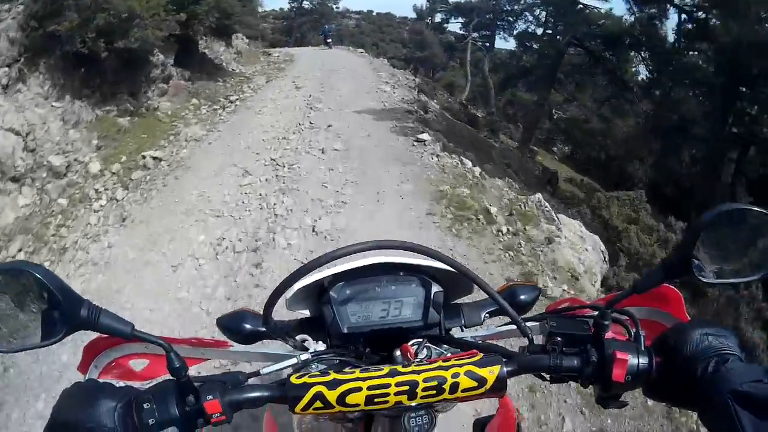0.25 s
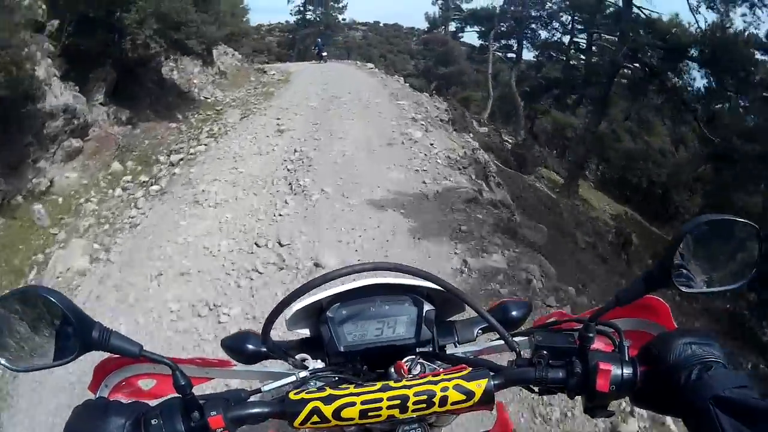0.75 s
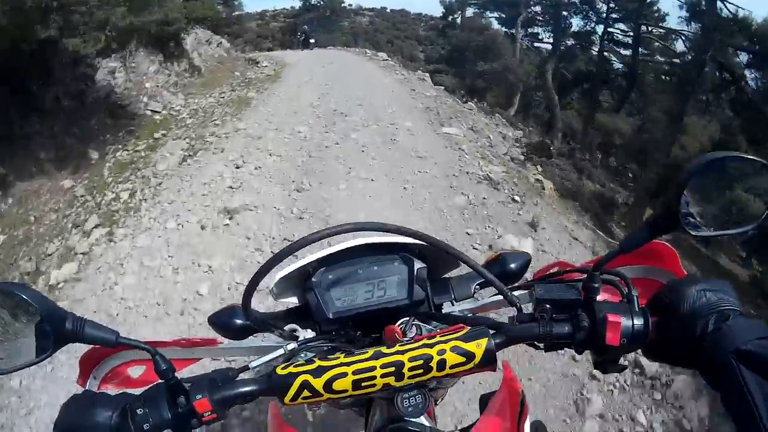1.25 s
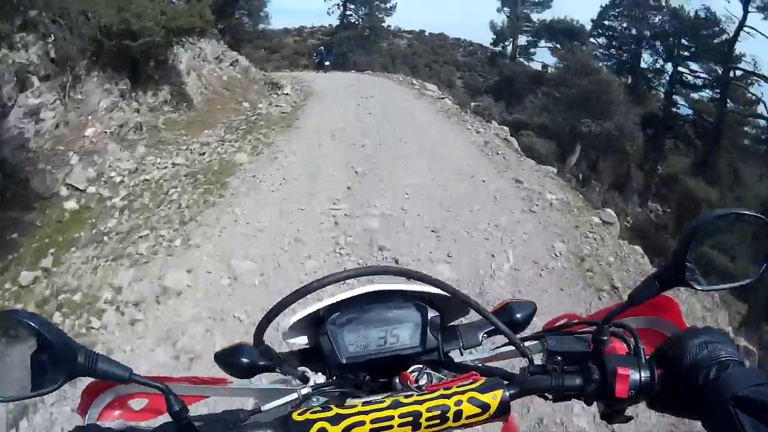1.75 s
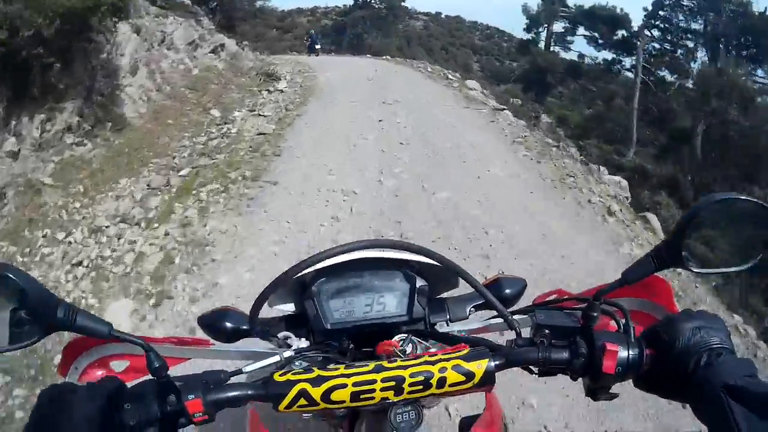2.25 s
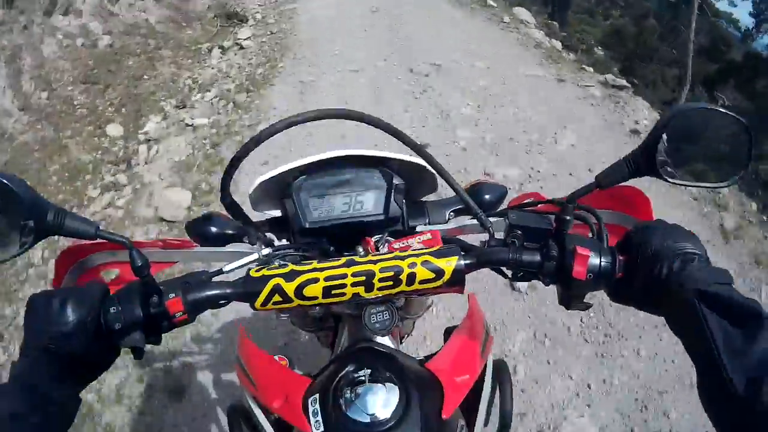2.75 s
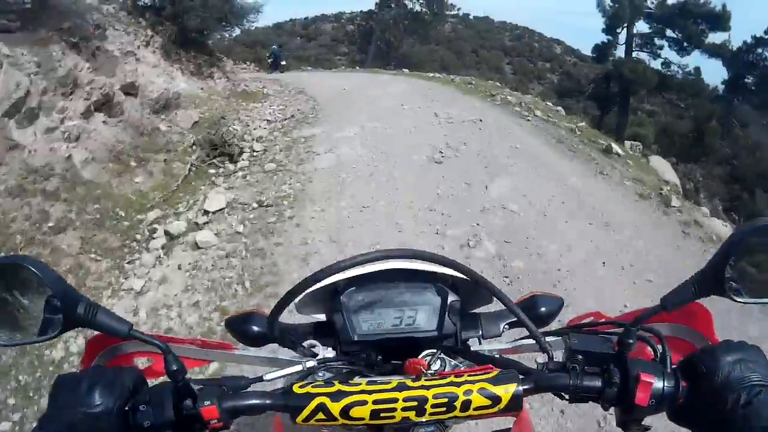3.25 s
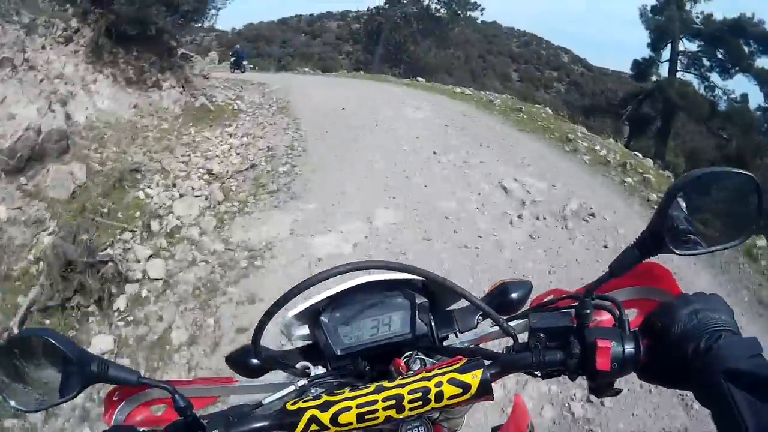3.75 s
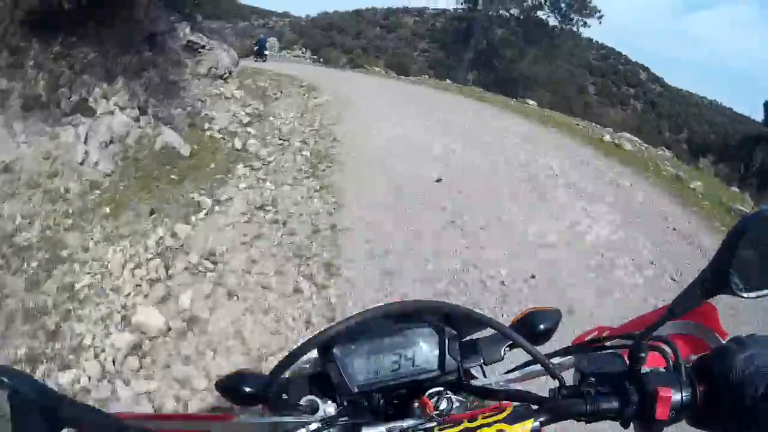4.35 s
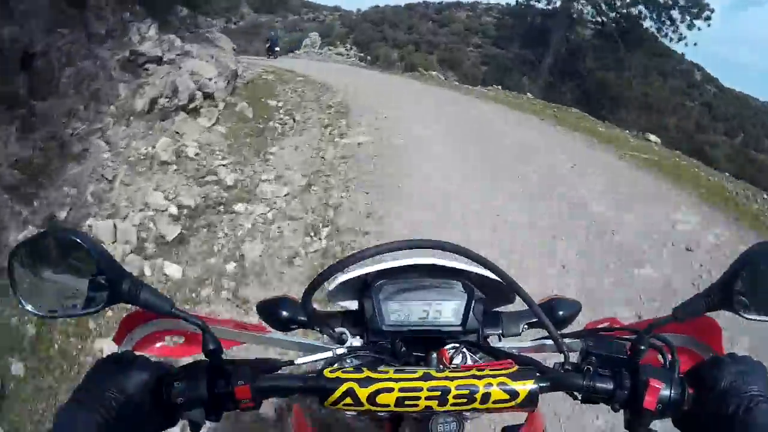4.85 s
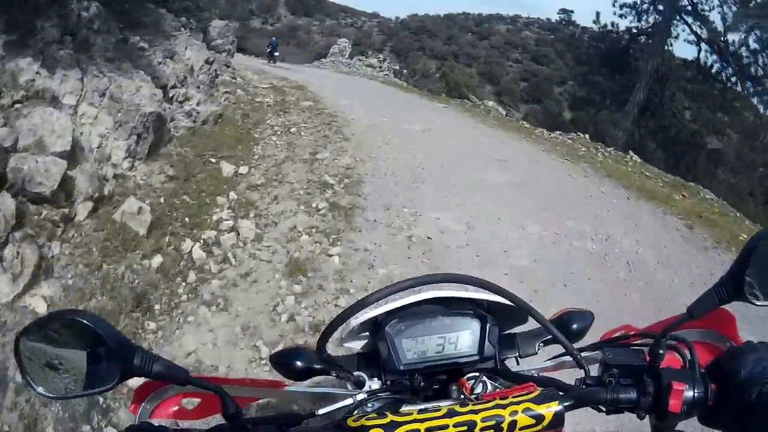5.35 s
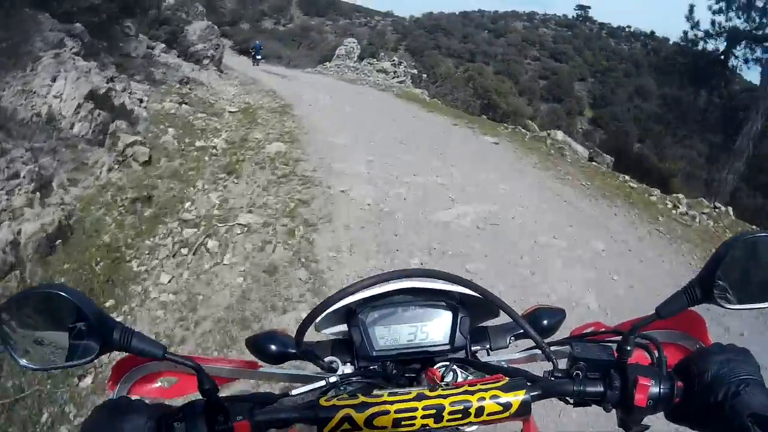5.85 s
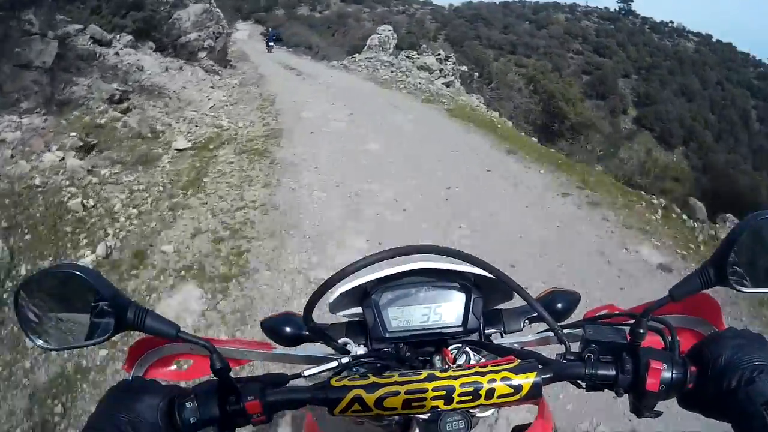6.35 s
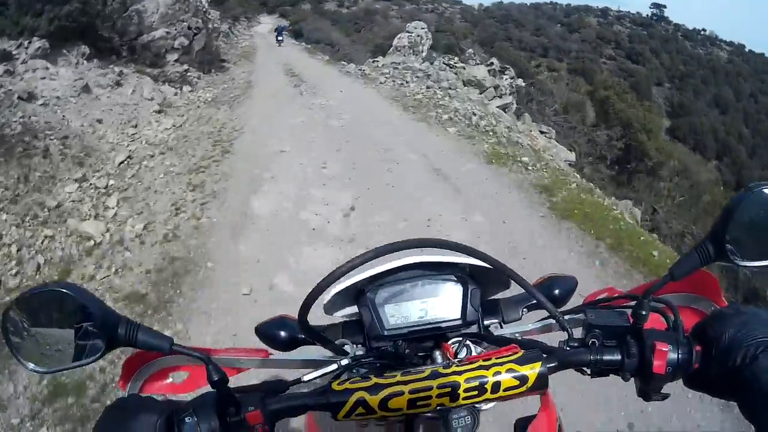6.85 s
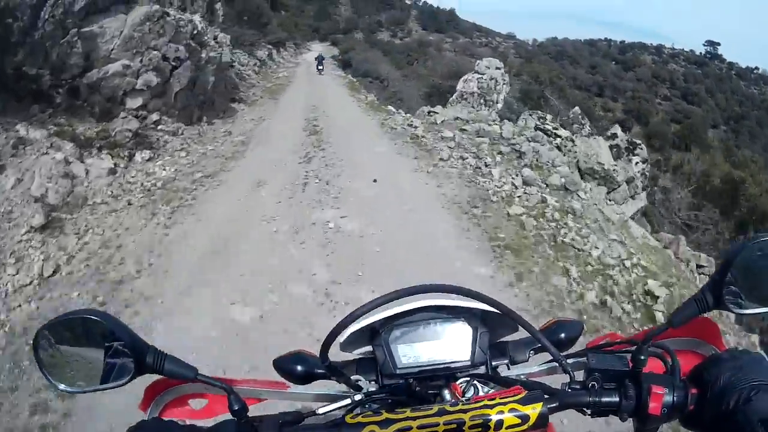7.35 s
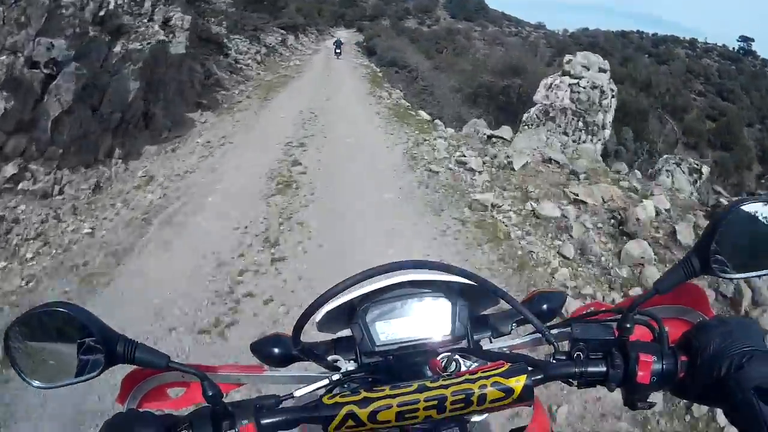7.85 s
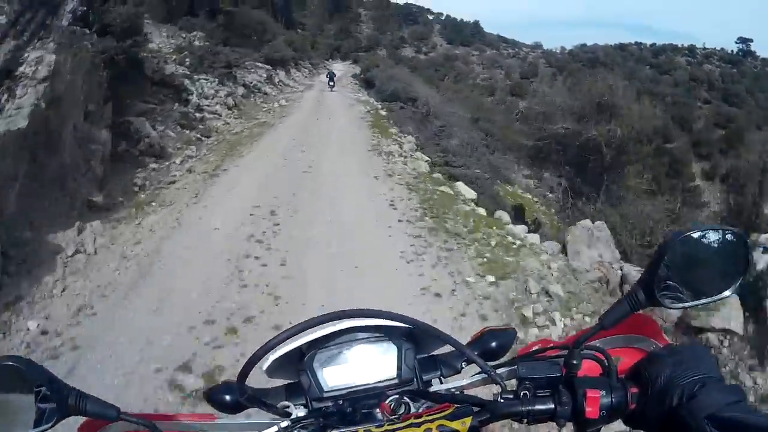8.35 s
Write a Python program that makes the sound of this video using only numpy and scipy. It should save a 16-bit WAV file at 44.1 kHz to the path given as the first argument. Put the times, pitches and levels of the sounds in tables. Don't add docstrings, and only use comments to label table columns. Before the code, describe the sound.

A small off-road motorbike climbs a rough open-air gravel track, its fast firing pulses blurred into a nasal, hissy rattle inside a plastic camera case. Jolts hit the case as dull thuds and hard clacks, busiest from one to three seconds. The pitch sags with a gear change, then slowly rises, ticking more clearly near the end. Deep bass sways, loose metal tinkles, and the close microphone hisses faintly.

```python
import sys
import numpy as np
from scipy import signal
from scipy.fft import rfft, irfft
from scipy.io import wavfile
from scipy.ndimage import uniform_filter1d

SR = 44100
rng = np.random.default_rng(int(sys.argv[2]) if len(sys.argv) > 2 else 0)


def attenuation_scalar(level_db):
    decades = np.asarray(level_db, float) / 20
    return 10 ** decades


def transcribe(signal):
    frames = np.atleast_2d(signal).T
    limited = np.clip(frames, -1, 1)
    pcm = np.round(limited * 32767).astype(np.int16)
    wavfile.write(sys.argv[1], SR, pcm)


N = 379260

# (time [s], firing rate [Hz])
REVS_HZ = [(0, 37.7), (.46, 37.75), (.82, 38.4), (1.2, 39), (2, 40.3), (2.6, 40.6), (2.88, 38.2), (3, 39.9),
           (3.07, 39.3), (3.14, 37.6), (3.27, 37.2), (3.3, 32), (3.45, 29.7), (3.65, 28.2), (5, 28.5),
           (6.5, 29), (7.48, 29.9), (8.6, 31.1)]
# (time [s], effort [dB], gear tooth level [dB], firing sharpness [0-1])
THROTTLE = [(0, 0, -62, 0.7), (.6, -0.5, -65, 0.8), (.9, -1, -66, 0.9), (1.2, 0, -60, 0.64), (2, 3, -68, 0),
            (2.6, 4, -64, 0.96), (2.85, 0, -66, 0.2), (2.94, -1, -47, .2), (3.05, -3.5, -49, 0.2),
            (3.2, -1.5, -45, 0), (3.3, 1, -58, 0.6), (3.45, 1.8, -64, 0.5), (3.7, -0.1, -80, 1),
            (4.25, 4, -60, 0.74), (5, 1.5, -75, 0.5), (6.1, 2, -68, 0.67), (7.4, -1, -65, 0.9),
            (8.6, 0, -66, 0.9)]
# (time [s], share of clatter repeated each cycle [0-1])
EVENNESS = [(0, .8), (.85, .75), (1.2, .4), (2, .2), (2.6, .1), (3.7, .15), (7, .2), (7.5, .5), (8, .55),
            (8.6, .4)]
# (frequency [Hz], width [Hz], level [dB])
LID = [(1277, 84, 1), (1366, 79, 4.5)]
# (frequency [Hz], width [Hz], level [dB])
WALLS = [(1559, 157, -0.5), (1764, 107, 5.5), (1904, 96, -2), (2101, 146, 0.5), (2314, 227, -3),
         (2536, 57, -12)]
# (frequency [Hz], width [Hz], level [dB])
CLATTER = [(2850, 260, -3.5), (2977, 220, 4), (3860, 630, -4.5), (4412, 384, -2.5), (5410, 1520, -10.5),
           (6250, 110, -15)]
# (frequency [Hz], width [Hz], level [dB])
EXHAUST = [(501, 68, 2), (618, 81, 0.5), (1063, 780, -11.5)]
# (frequency [Hz], width [Hz], level [dB])
BUZZ = [(2746, 190, 0)]
# (level [dB], effort slope [dB/dB], rough ground slope [dB/dB], revs slope [dB/Hz])
NOISE_LEVELS = [
    (-57.5, 0.63, 0.55, 0),
    (-54, 0.46, 0.1, 0.36),
    (-63.5, 1.13, 0.37, 0.18),
    (-60, 1.4, 0.65, 0.15),
    (-76, 0.6, 0.3, 1.97),
]
# (frequency [Hz], width [Hz], level [dB])
BARK = [(1288, 46, 0), (2270, 40, -11), (2535, 50, -10)]
# (time [s], level [dB])
TICK_DB = [(0, -69), (3.3, -74), (4.1, -66.5), (6, -68), (7.4, -61.5), (8.6, -57.5)]
# (frequency [Hz], level [dB], t60 [s])
TICK_RING = [(2110, 1, 0.018), (2230, 1, 0.02), (2990, -13, .01)]
# (frequency [Hz], width [Hz], level [dB])
PIPE = [(267, 45, 6), (385, 30, -5), (455, 30, -1), (500, 35, -4), (605, 30, 1), (648, 40, 2.5)]
# (frequency [Hz], width [Hz], level [dB])
GEAR_WINDOWS = [(1767, 540, -7.5), (2160, 980, 2)]
# (time [s], knock peak [dB], mount [dB], shell [dB], snap [dB])
STONES = [(.003, -32.5, -42, -42, -52), (1.384, -28.5, -50, -62, -39.5), (1.537, -33.5, -57, -42, -34.5),
          (1.582, -23.5, -54, -40, -37.5), (1.659, -23, -37, -32, -40), (1.711, -20.5, -33, -51, -36),
          (1.755, -10, -20, -29, -24.5), (1.764, -22, -54, -39, -32), (1.896, -37, -35, -35, -42),
          (2.189, -33.5, -46, -35, -41), (2.399, -28.5, -30.5, -33, -32.5), (2.446, -7.5, -19, -23, -29),
          (2.46, -27, -25, -37, -57), (2.891, -32, -37, -32.5, -41), (2.978, -16, -26.5, -37, -45),
          (4.125, -26, -37, -36, -39.5), (5.267, -28, -39.5, -34.5, -46), (6.502, -26.5, -45, -34, -40),
          (6.525, -29.5, -62, -35, -44), (6.697, -38, -36, -38, -50), (6.749, -6, -17, -21, -26),
          (7.011, -22, -36, -36, -29.5), (7.014, -29, -55, -33, -39), (7.341, -30.5, -38, -33.5, -44),
          (8.193, -32.5, -40.5, -41, -64)]
# (time [s], knock peak [dB], mount [dB], shell [dB])
RUTS = [(1.257, -29.5, -38, -36), (2.22, -34, -32.5, -52), (2.656, -34, -42, -42), (2.713, -32, -42, -41),
        (2.918, -36, -49, -44), (3.153, -32.5, -58, -38), (3.188, -29, -39, -40), (3.492, -28.5, -37, -35),
        (3.509, -36, -34, -41), (3.687, -37.5, -36.5, -46), (3.856, -31, -42, -51), (4.139, -28, -34, -45),
        (4.262, -34, -40, -45), (4.312, -33, -35.5, -52), (1.94, -44, -47, -40.5), (2.416, -37, -33, -50),
        (2.5, -37, -40, -49), (2.83, -42, -40.5, -40.5), (3.533, -36, -40, -45), (3.97, -43, -48, -46),
        (5.04, -48, -49, -45), (4.63, -39, -43, -58), (2.405, -40, -43, -38.5), (1.268, -40, -48, -40),
        (4.148, -38, -50, -41.5), (6.676, -37, -60, -45), (4.437, -23.5, -33.5, -53),
        (4.456, -31.5, -64, -41), (4.706, -34, -35, -49), (4.73, -32.5, -34.5, -39), (5.284, -37, -45, -53),
        (5.449, -32.5, -43.5, -47), (5.611, -31.5, -33, -55), (5.855, -30, -36.5, -42.5),
        (6.037, -33.5, -46.5, -68), (6.196, -30, -43, -55), (6.561, -35.5, -49, -42),
        (6.668, -28.5, -69, -48), (6.938, -32, -41.5, -37.5), (7.358, -31.5, -51, -62),
        (7.387, -33.5, -28.5, -40)]
# (time [s], knock peak [dB], mount [dB])
PEBBLES = [(.668, -42, -51), (1.217, -38, -61), (1.673, -37, -35), (2.024, -45, -40), (2.058, -36, -44),
           (2.132, -42, -59), (2.309, -33.5, -37), (2.353, -35, -44), (4.349, -34, -34),
           (4.392, -60, -34.5), (5.236, -37, -43.5), (5.483, -42, -53), (6.239, -33, -47),
           (6.369, -51, -41.5), (6.895, -42, -45), (7.64, -43, -42), (8.467, -40.5, -45), (1.48, -36, -51),
           (1.849, -39, -39), (1.965, -43, -42), (2.092, -37, -52), (2.807, -36, -38), (3.719, -40, -39),
           (4.058, -47, -45), (4.189, -43, -56), (4.477, -43, -48)]
# (frequency [Hz], level [dB], t60 [s])
MOUNT = [(99.2, -1, 0.24)]
# (frequency [Hz], level [dB], t60 [s])
STRAP = [(160, -6.5, 0.072)]
# (frequency [Hz], level [dB], t60 [s])
BODY = [(251.7, 2, 0.028), (294.7, 0.5, 0.034), (352, -12, 0.031)]
# (frequency [Hz], level [dB], t60 [s])
SHELL = [(572, -2.5, 0.023), (668, -3.5, 0.04), (723, -0.5, 0.015), (926, -6.5, 0.021)]
# (frequency [Hz], level [dB], t60 [s])
SNAP = [(1405, -6, 0.032), (1588, 3.5, 0.017), (1750, -15.5, 0.0092), (2850, -14, 0.015),
        (4170, -22, 0.0027)]
# (time [s], rumble [dB])
TRACK_DB = [(0, -52.5), (.9, -49.5), (1.5, -46.5), (1.68, -47), (2.13, -49.5), (2.42, -53), (2.66, -54.5),
            (2.99, -45.5), (3.25, -51.5), (3.74, -49.5), (3.97, -56), (4.33, -53.5), (4.6, -57), (5.1, -52),
            (6.4, -57), (7.2, -53), (7.66, -52), (8.6, -53.5)]
# (time [s], sway [dB])
HEAVES_DB = [(.03, -49), (.69, -46), (1.1, -47), (1.4, -43), (1.68, -40), (1.95, -41.5), (2.1, -44),
             (2.42, -36.5), (2.9, -35.5), (3.21, -51), (3.5, -50), (3.74, -52), (3.9, -48), (4.14, -52),
             (4.33, -35.5), (4.81, -53), (5.27, -44), (5.6, -44.5), (6.23, -45), (6.6, -52), (6.75, -49),
             (7.4, -55), (7.66, -66), (7.91, -66), (8.19, -50)]
# (frequency [Hz], level [dB], t60 [s])
STEEL = [
    [(8030, -2.5, .1), (8095, -4, .08), (10350, -5, .05)],
    [(11275, 0, .1), (11315, 0, .08), (15650, -5, .08)],
    [(11750, 2, .09), (11790, -2, .08), (13050, -6, .06)],
]
# (time [s], peak [dB])
BUCKLE_TAPS = [(1.5943, -68), (1.6626, -63), (1.696, -73), (1.7814, -69), (2.1435, -66), (2.1799, -60),
               (2.2727, -63), (2.3705, -63), (2.3999, -69), (2.5187, -71), (2.72, -59), (4.121, -61),
               (4.358, -65), (5.0115, -67), (6.7012, -72), (6.7346, -63)]
# (time [s], middle peak [dB], high peak [dB])
KEY_TAPS = [(1.4536, -72, -73), (1.5307, -64, -60), (1.59, -61, -65), (1.6975, -65, -80), (1.931, -64, -69),
            (1.996, -66, -67), (2.054, -70, -65), (2.177, -65, -67), (2.2258, -55, -74), (2.259, -68, -77),
            (2.3466, -71, -80), (2.456, -77, -73), (2.604, -68, -67), (2.759, -64, -58), (2.527, -71, -66),
            (2.8574, -63, -80), (2.975, -61, -70), (3.1767, -71, -70), (3.693, -68, -69),
            (3.8197, -72, -72), (4.092, -64, -70), (4.18, -59, -75), (4.242, -64, -65), (4.283, -65, -58),
            (6.346, -70, -67), (6.521, -68, -66), (6.574, -64, -74), (6.6004, -59, -80), (6.7343, -66, -67),
            (6.9611, -70, -70)]
# (frequency [Hz], level [dB], t60 [s])
DRY_TICK = [(4080, -1.5, 0.0036), (6030, -4.5, .004), (7030, -2, .003), (9800, -5.5, .002)]
# (time [s], peak [dB])
FLINT = [
    (8.473, -49),
]
# (frequency [Hz], level [dB], t60 [s])
FLINT_RING = [(4400, 4, .014), (3850, -3, .014)]
# (frequency [Hz], level [dB])
HISS = [(600, -2), (3000, -6.5), (7000, -15.5), (10000, -16), (14000, -17.5), (16000, -21)]


def engine():
    revs_hz = curves(REVS_HZ)[0]
    phase = np.cumsum(revs_hz * (1 + .0008 * walk(6))) / SR
    cycle = phase.astype(int)
    strength = attenuation_scalar(4.2 * rng.standard_normal(N // 500))[cycle]
    thumps = level(np.diff(cycle, prepend=0) * strength, 0)
    effort_db, _, sharp = curves(THROTTLE)
    even = curves(EVENNESS)[0]
    rough_db = np.clip(curves(TRACK_DB)[0], -60, -40) + 50

    firing = 0.62 * np.exp(-(phase % 1) / 0.13) * strength
    idle = 0.13 * np.exp(-((phase + .5) % 1) / 0.12)
    gate = .5 + sharp * (firing + idle)

    repeat = same_each_cycle(phase)
    bark = level(resonate(repeat + .5 * rng.standard_normal(N), BARK), -57)
    bark = bark * even ** 2 * (revs_hz / 38) ** 3
    tick = level(ring(thumps, TICK_RING), 0) * attenuation_scalar(curves(TICK_DB)[0])
    out = tones(phase, repeat) + bark + tick

    shake_db = .6 * walk(16)
    parts = (LID, WALLS, CLATTER, EXHAUST, BUZZ)
    thumps_db = (-22.5, -16.0, -11.0, -4.5, -11)
    flickers_db = (0.28, 0.83, 1.13, 1.07, 0.62)
    for peaks, slopes, thump_db, flicker_db in zip(parts, NOISE_LEVELS, thumps_db, flickers_db):
        base_db, per_effort, per_rough, per_hz = slopes
        part_db = base_db + per_effort * effort_db + per_rough * rough_db + per_hz * (revs_hz - 34)
        noise = level(gate * rng.standard_normal(N), 0) + attenuation_scalar(thump_db) * sharp * thumps
        drive = np.sqrt(1 - even) * noise + np.sqrt(even) * repeat
        out = out + level(resonate(drive, peaks), 0.92) * attenuation_scalar(part_db + shake_db + flicker_db * walk(15))
    return out


def tones(phase, repeat):
    effort_db, gear_db, _ = curves(THROTTLE)
    tone_db = -55 + 0.1 * effort_db + 0.091 * (curves(REVS_HZ)[0] - 34)
    exhaust = level(resonate(repeat, PIPE), 0) * curves(EVENNESS)[0] * attenuation_scalar(tone_db + 1.5 * walk(3.07))

    turn = 2 * np.pi * phase
    gear_order = 23
    whine = 0
    for k in (2, 3):
        angle = gear_order * turn + .3 * np.sin(turn) + .4 * walk(40)
        whine = whine + attenuation_scalar(gear_db + 3 * walk(25)) * np.sin(k * angle)
    return steep_low(exhaust, 690) + steep_low(resonate(whine, GEAR_WINDOWS), 2300)


def same_each_cycle(phase, size=2048):
    bins = np.arange(size // 2 + 1)
    spectrum = np.exp(2j * np.pi * rng.random(size // 2 + 1)) * (bins < size / 8)
    once = irfft(spectrum, size)
    return level(np.interp(phase % 1 * size, np.arange(size + 1), np.append(once, once[0])), -3)


def bumps():
    s, knock_db, mount_db, shell_db, snap_db = blow_table()
    soft_db = np.maximum(knock_db, -34)
    bounce_db = -2 - 0.0562 * (soft_db + 21)
    looser = np.exp(-.03 * (soft_db + 24))
    strap_db = mount_db - 0.36 * (mount_db + 39)
    s = s + .0015
    n = len(s)

    snap = blows(s + 0.001027, snap_db - 0.5, 0.00014, bounce_db + 2.5, 0.0054 * looser, loose(n, count=12))
    mount = blows(s + 0.0018, mount_db + 4.5, 0.0045, bounce_db - 13.0, 0.0121, loose(n, count=4))
    strap = blows(s + 0.002, strap_db + 5.5, 0.0022, bounce_db - 6.0, 0.0111, loose(n, count=4))
    body = blows(s, knock_db - 4.5, 0.002, bounce_db - 2.5, 0.01285, loose(n, count=7))
    shell = blows(s + 0.00081, shell_db - 9.0, 0.00088, bounce_db + 5.5, .011 * looser, loose(n, count=14))

    out = ring(body, BODY) + ring(shell, SHELL) - ring(mount, MOUNT) - ring(strap, STRAP)
    out = out + high_pass(ring(snap, SNAP), 1160, order=3)
    return high_pass(out, 42, order=2)


def blow_table():
    ruts = [(*r, r[3] - 10) for r in RUTS]
    pebbles = [(*p, p[1] - 15.5, p[1] - 16.5) for p in PEBBLES]
    return np.transpose(STONES + ruts + pebbles)


def blows(times, db, push_s, bounce_db, bounce_s, chance):
    x = np.zeros(N + SR)
    push = np.hanning(int(push_s * SR) + 3)
    for t, d, b, span, (late, size) in zip(times, db, bounce_db, bounce_s + 0 * times, chance):
        at = ((t + np.append(0, span * late)) * SR).astype(int)
        bounces = attenuation_scalar(b) * np.tanh(size) * np.exp(-.6 * late)
        np.add.at(x, at, -attenuation_scalar(d) * np.append(1, bounces))
    return np.convolve(x, push / push.sum())[:N]


def loose(events, count):
    late = 0.291 + rng.exponential(size=(events, count))
    return np.stack([late, rng.standard_normal((events, count))], axis=1)


def ground():
    s, _, mount_db = blow_table()[:3]
    loosened = swells(s, mount_db - 21, rise_db_s=226, fall_db_s=153)
    rumble_gain = attenuation_scalar(curves(TRACK_DB)[0]) + loosened
    slack = 0.51 + 1.06 * loosened / rumble_gain
    sway_gain = attenuation_scalar(-55) + swells(*np.transpose(HEAVES_DB), rise_db_s=90, fall_db_s=85)

    hits = rng.random(N) < 450 / SR
    jolts = hits * rng.standard_normal(N) * attenuation_scalar(1.4 * rng.exponential(size=N))
    jolts = level(jolts, 0) + 0.59 * rng.standard_normal(N)
    soft = uniform_filter1d(jolts, size=40)

    rumble = level(ring(soft, MOUNT), -4.5) + level(ring(soft, BODY), -4.5)
    flap = level(ring(soft, STRAP), -11.5) + level(resonate(soft, [(140.8, 102, 0)]), -3.0)
    rumble = rumble + slack * flap
    sway = level(resonate(rng.standard_normal(N), [(16.3, 9.0, 11.0), (38.3, 76, 0.0)]), -0.58)
    return rumble * rumble_gain * attenuation_scalar(1.6 * walk(18)) + sway * sway_gain


def swells(times, db, rise_db_s, fall_db_s):
    t = np.arange(0, N + 200, 200) / SR
    late = t[:, None] - times
    gain = attenuation_scalar(db + np.where(late < 0, rise_db_s, -fall_db_s) * late).sum(axis=1)
    return np.interp(np.arange(N) / SR, t, gain)


def jingles():
    rough = attenuation_scalar(np.clip(curves(TRACK_DB)[0], -60, -44) + 42.5)
    when, middle_db, high_db = np.transpose(KEY_TAPS)
    taps = (np.transpose(BUCKLE_TAPS), (when, middle_db), (when, high_db))
    out = 0
    for (s, db), modes in zip(taps, STEEL):
        x = blows(s, db + 0.5, .00005, 0 * s - 3.5, 0.029, loose(len(s), count=7))
        chatter = rng.standard_normal(N) * (rng.random(N) < 70 / SR)
        x = x + attenuation_scalar(-77.5) * rough * chatter
        out = out + ring(x, modes) + attenuation_scalar(9) * ring(x, DRY_TICK)
    s, db = np.transpose(FLINT)
    chip = blows(s, db, .00005, 0 * s - 6, 0.0065, loose(len(s), count=7))
    return out + ring(chip, FLINT_RING)


def microphone_floor():
    hz, db = np.transpose(HISS)
    bins_hz = np.arange(N // 2 + 1) * SR / N
    colour = attenuation_scalar(np.interp(np.log(bins_hz + 1), np.log(hz), db))
    hiss = irfft(rfft(rng.standard_normal(N)) * colour, N)
    whine_hz = 9525
    whine = attenuation_scalar(-90) * np.sin(2 * np.pi * whine_hz * np.arange(N) / SR + 0.25 * walk(9))
    return level(hiss, -62) + whine


def level(x, db):
    return x * attenuation_scalar(db) / np.sqrt(np.mean(x ** 2))


def curves(table):
    s, *columns = np.transpose(table)
    return [np.interp(np.arange(N) / SR, s, c) for c in columns]


def walk(rate_hz):
    k = int(SR / rate_hz)
    held = np.repeat(rng.standard_normal(N // k + 1), k)
    return 1.3 * uniform_filter1d(uniform_filter1d(held, k), k)[:N]


def ring(x, modes):
    out = 0
    for hz, db, t60_s in modes:
        pole = np.exp(2j * np.pi * hz / SR - np.log(1000) / (t60_s * SR))
        out = out + attenuation_scalar(db) * signal.lfilter([1], [1, -pole], x).imag
    return out


def resonate(x, peaks):
    out = 0
    for k, (hz, width_hz, db) in enumerate(peaks):
        edges_hz = [hz - width_hz / 2, hz + width_hz / 2]
        band = signal.butter(2, edges_hz, "band", fs=SR, output="sos")
        out = out + (-1) ** k * attenuation_scalar(db) * signal.sosfilt(band, x)
    return out


def high_pass(x, hz, order):
    return signal.sosfilt(signal.butter(order, hz, "high", fs=SR, output="sos"), x)


def steep_low(x, hz):
    return signal.sosfilt(signal.ellip(8, .3, 45, hz, fs=SR, output="sos"), x)


def scene():
    return (engine() + bumps() + ground() + jingles() + microphone_floor())[None]


def low_pass(x):
    return signal.sosfilt(signal.butter(12, 15700, fs=SR, output="sos"), x)


def record(dry):
    mix = steep_low(dry, 15700)
    return low_pass(mix)


dry = scene()
out = record(dry)
transcribe(out)
```